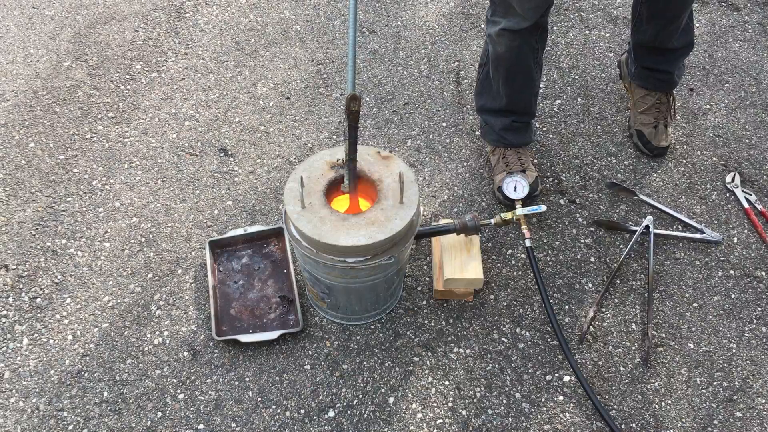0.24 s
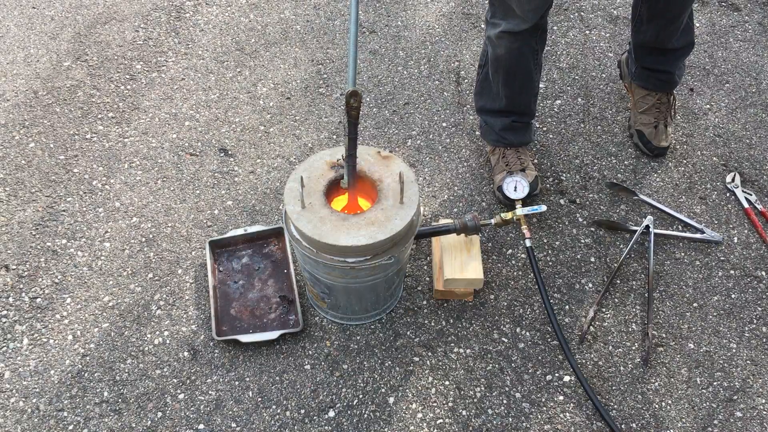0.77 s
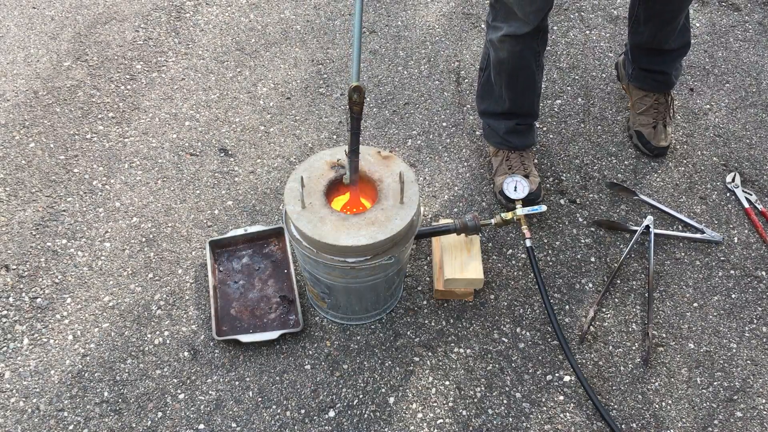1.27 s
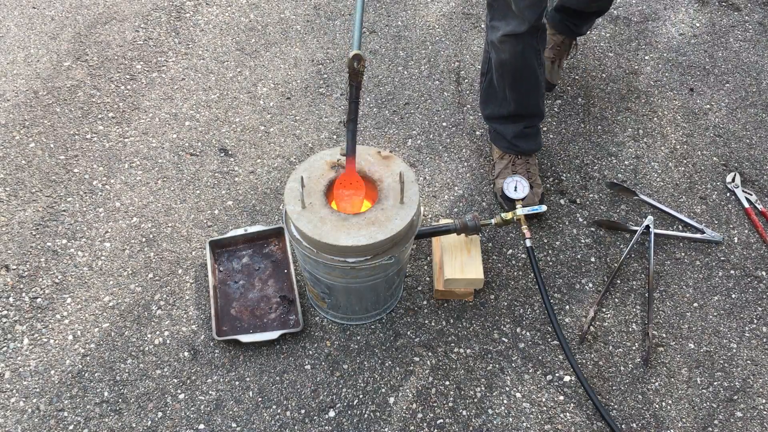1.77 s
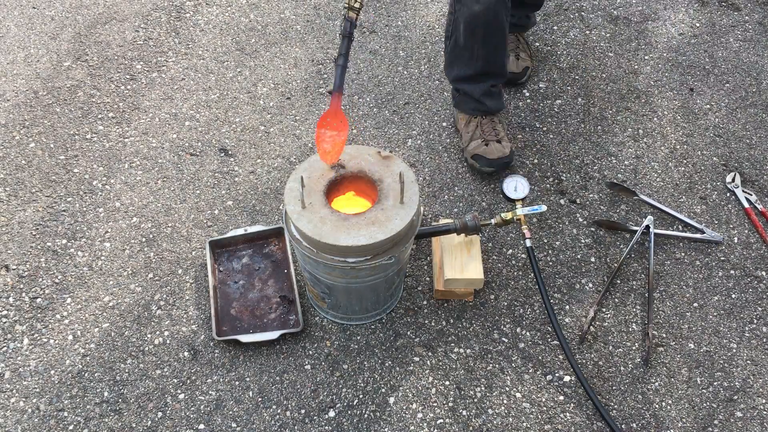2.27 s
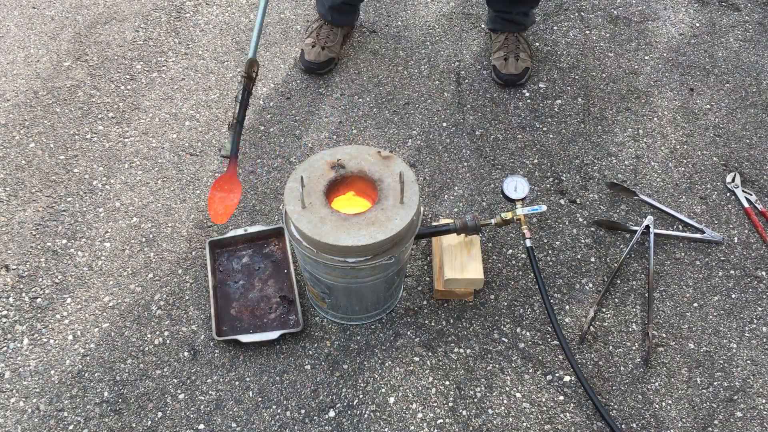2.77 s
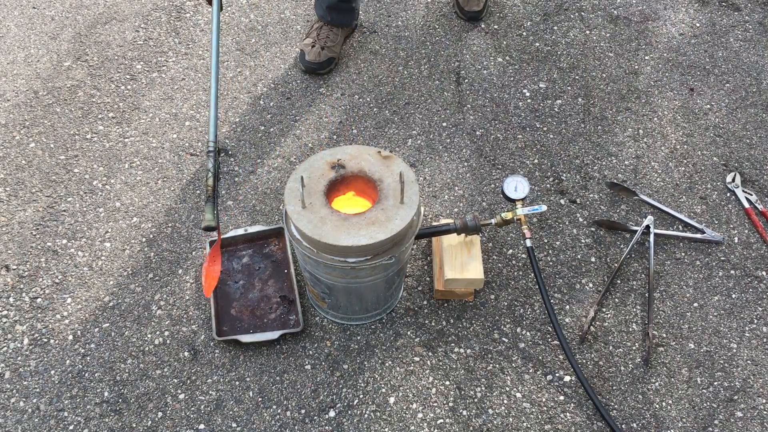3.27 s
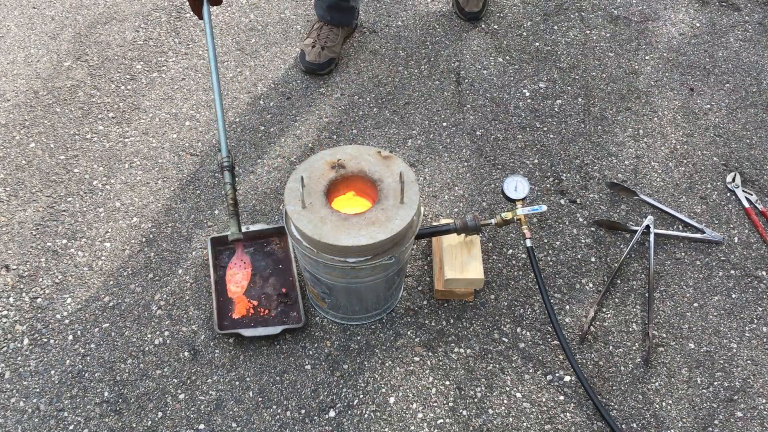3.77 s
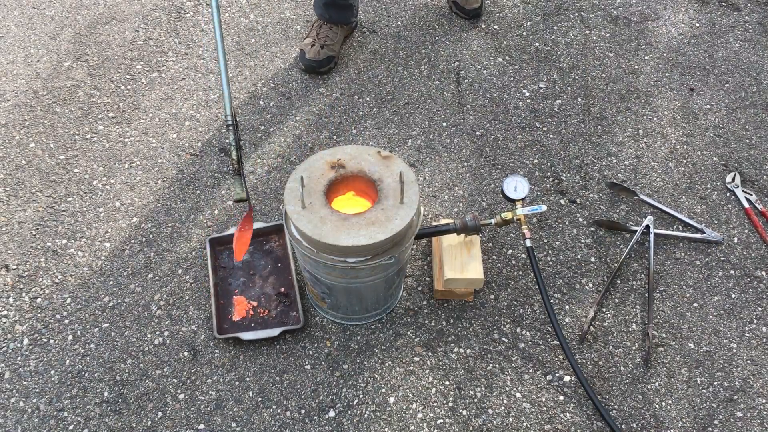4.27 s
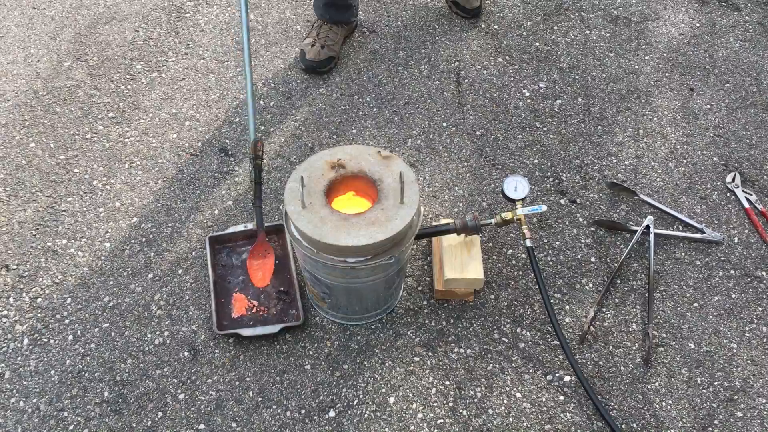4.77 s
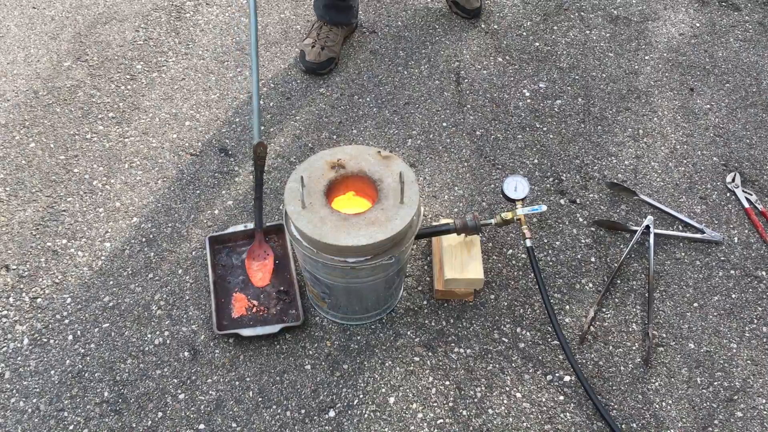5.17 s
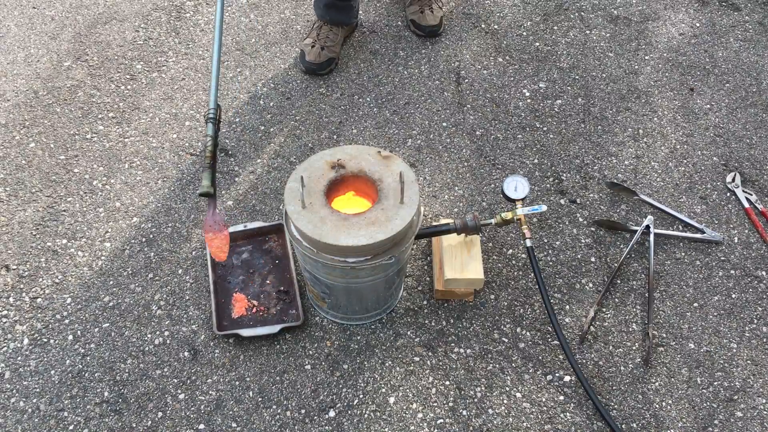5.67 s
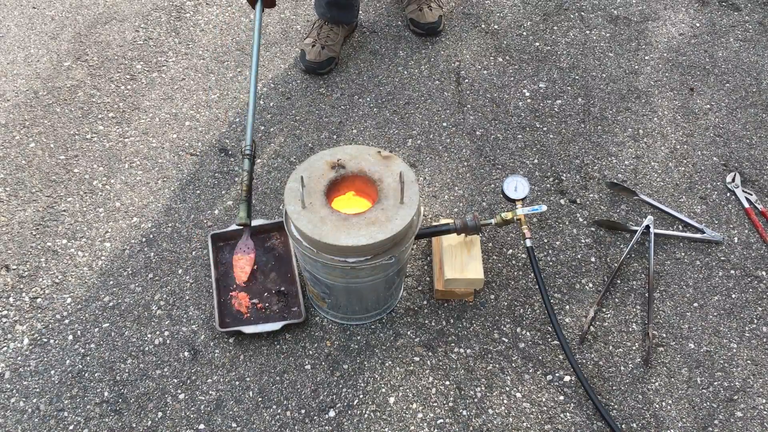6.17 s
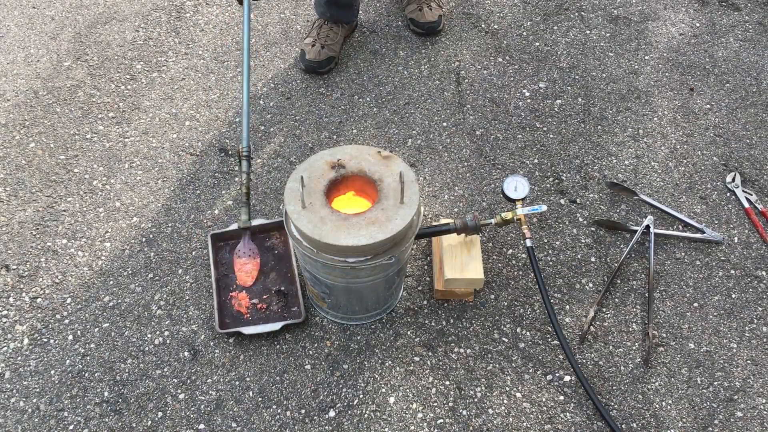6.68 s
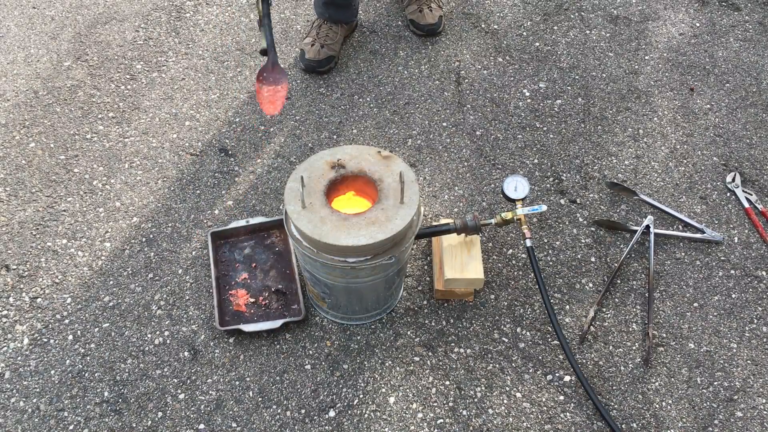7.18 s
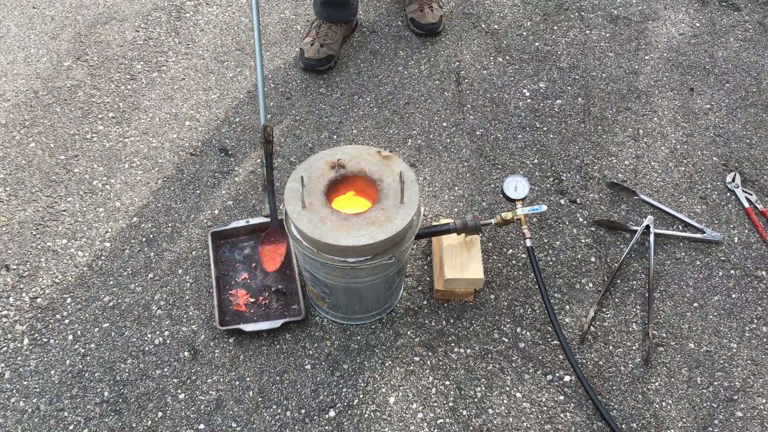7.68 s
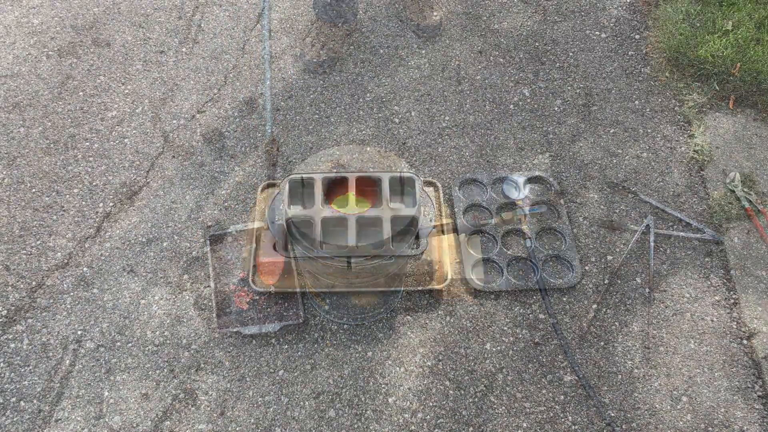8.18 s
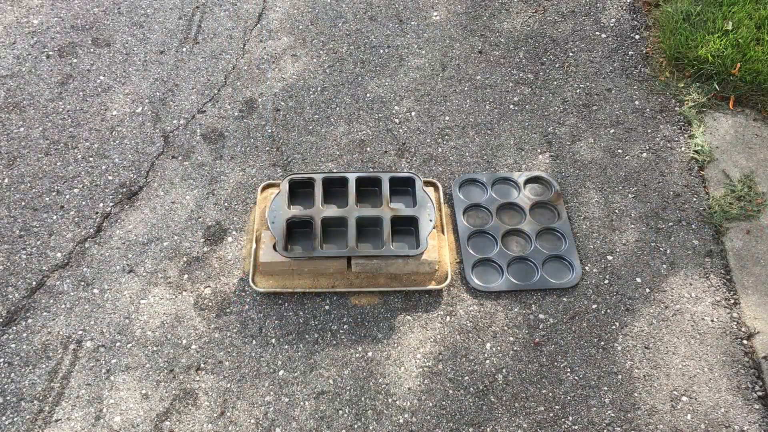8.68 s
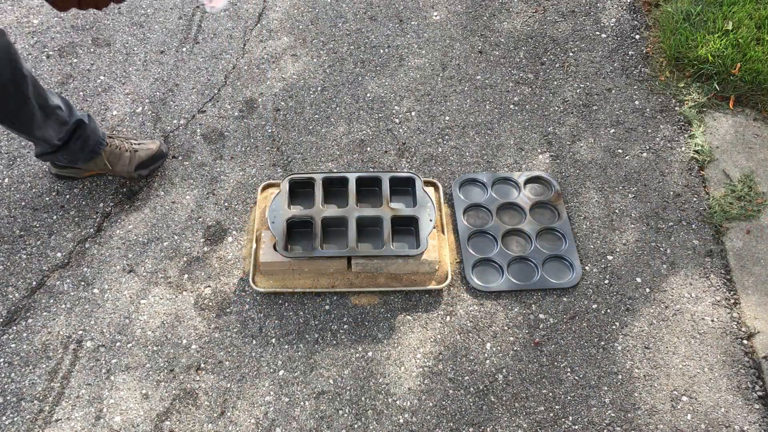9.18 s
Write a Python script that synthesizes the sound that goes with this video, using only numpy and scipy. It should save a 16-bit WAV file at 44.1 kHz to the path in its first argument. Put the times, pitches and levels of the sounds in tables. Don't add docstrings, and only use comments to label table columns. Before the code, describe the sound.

A small gas furnace roars outdoors from the start, a low, fluttering boom with a bright, steady gas hiss on top. Soft wind gusts thump the microphone around 0.4 to 0.9 s. Shoe soles scuff asphalt faintly from 1.4 to 2.4 s as the spoon leaves the mouth and the roar opens slightly. At 3.65 s the spoon bangs a sheet-metal pan: a loud, bouncing clang with short rim ringing and slag rattling until 3.9 s. Lighter taps come at 4.63 s, amid scuffs and small flares. Hard double clangs hit at 6.2 s, with a wind puff just before, and another at 6.82 s. A short scrape at 7.85 s ends in a knock at 8.0 s. The furnace fades and is gone by 8.35 s, leaving a very quiet yard: far traffic rumble, distant insects, a pulsing katydid, cricket chirps at 8.6 and 9.2 s, and grit crunching under a boot near 9.4 s.

```python
import sys
import numpy as np
from scipy import signal
from scipy.fft import rfft, irfft
from scipy.io import wavfile

SR = 44100
rng = np.random.default_rng(int(sys.argv[2]) if len(sys.argv) > 2 else 0)


def voltage_ratio(level):
    return 10 ** (np.asarray(level, float) / 20)


def generate_wav(sig):
    pcm = np.round(np.clip(np.atleast_2d(sig).T, -1, 1) * 32767).astype(np.int16)
    wavfile.write(sys.argv[1], SR, pcm)


N = 416304
TIME = np.arange(N) / SR
HZ = np.maximum(np.fft.rfftfreq(N, 1 / SR), 1)


def rms_one(x):
    return x / np.sqrt(np.mean(x ** 2) + 1e-20)


def in_time(rows):
    s, *columns = np.transpose(rows)
    return [np.interp(TIME, s, c) for c in columns]


def add_at(out, s, sound):
    start = round(s * SR)
    out[..., start:start + sound.shape[-1]] += sound


def bells(bumps):
    return sum(db / (1 + (2 * (HZ - hz) / width) ** 2) for hz, width, db in bumps)


def level_db(points, bumps):
    hz, db = np.transpose(points)
    return np.interp(np.log(HZ), np.log(hz), db) + bells(bumps)


def colour(x, points, bumps=()):
    return rms_one(irfft(rfft(x) * voltage_ratio(level_db(points, bumps)), N))


def resound(drive, points, bumps):
    body_db = level_db(points, bumps)
    cepstrum = irfft(body_db * np.log(10) / 20, N)
    cepstrum[1:N // 2] *= 2
    cepstrum[N // 2 + 1:] = 0
    body = np.exp(rfft(cepstrum)) / np.sqrt(np.mean(voltage_ratio(body_db) ** 2))
    return irfft(rfft(drive) * body, N)


def band(x, low_hz, high_hz):
    return signal.sosfilt(signal.butter(4, [low_hz, high_hz], "band", fs=SR, output="sos"), x)


def between(x, low_hz, high_hz):
    return signal.sosfiltfilt(signal.butter(2, [low_hz, high_hz], "band", fs=SR, output="sos"), x)


def drift(rate):
    r = np.exp(-80 * np.pi * rate / SR)
    slow = signal.lfilter([1], [1, -2 * r, r * r], rng.standard_normal(N // 40 + 2002))[2000:]
    return np.interp(np.arange(N) / 40, np.arange(len(slow)), rms_one(slow))


# frequency in Hz, level in dB per Hz.
FLAME_SPECTRUM = [(26, -53), (45, -19), (101, -5.5), (186, -4), (241, -1.5), (404, -2), (633, -10),
                  (779, -18.5), (959, -16.5), (1100, -19), (1350, -21), (1500, -34), (1880, -31.5),
                  (2800, -51), (3640, -70), (6160, -120)]
# frequency in Hz, width in Hz, level in dB.
CHAMBER_MODES = [(234, 46.5, -8), (423, 103, 3), (763, 37, -8), (918, 140, 2.5), (1120, 25, -12),
                 (1420, 46, 12.5), (1464, 79, -19.5), (1970, 80, 8), (2050, 134, -20)]
# time in seconds, share of the mouth filled (0-1).
SPOON_IN_MOUTH = [
    (0, 1),
    (1.75, 1),
    (2.1, 0),
    (9.44, 0),
]
# time in seconds, level of the mouth mode in dB.
MOUTH_SINGING = [
    (0.0, -33.5),
    (1.75, -34.5),
    (2.8, -29.5),
    (3.5, -29.5),
    (4.35, -31.5),
    (7.8, -30.5),
]
# time in seconds, share (0-1).
WORKER_LEAN = [
    (0, 0),
    (3.0, 0.07),
    (3.9, 0.5),
    (4.6, 1),
    (5.2, 0.8),
    (5.45, 0),
    (7.0, 0),
    (9.44, 0),
]
# time in seconds, swell in dB.
FLARES = [(0.130, 3.5), (0.239, 2.5), (0.385, -1), (0.671, 5.5), (1.0, 6), (2.568, 4), (2.670, 0),
          (2.95, 1), (3.091, -3), (3.496, 10), (4.352, 7), (4.928, 1.5), (5.053, 10.5), (5.375, 9),
          (7.457, 1)]
FLARE_RISE_S, FLARE_DECAY_S = 0.0024, 0.014
POCKETS_PER_S, POCKET_SHARE = 900, 0.6
ROAR_DB, UPPER_FLAME_DB = -21.5, -37.5


def flame():
    pockets = rms_one((rng.random(N) < POCKETS_PER_S / SR) * rng.exponential(1, N))
    turbulence = rng.standard_normal(N)
    heat = POCKET_SHARE * pockets + np.sqrt(1 - POCKET_SHARE ** 2) * turbulence
    roar = colour(heat * voltage_ratio(0.24 * drift(29)), FLAME_SPECTRUM, CHAMBER_MODES)
    (spoon,), (mouth_db,), (lean,) = in_time(SPOON_IN_MOUTH), in_time(MOUTH_SINGING), in_time(WORKER_LEAN)
    shifts = [(274, 345, mouth_db - np.mean(mouth_db)),
              (2130, 2500, 6.9 * spoon), (444, 580, 1.6 * spoon),
              (140, 243, 2.2 * spoon), (820, 1100, -1.3 * spoon),
              (1195, 1500, -5.1 * lean), (830, 1040, 1.0 * lean),
              (1000, 1120, -1.5 * lean), (130, 290, -1.1 * lean)]
    roar = roar + sum(between(roar, low_hz, high_hz) * (voltage_ratio(db) - 1) for low_hz, high_hz, db in shifts)

    flare_db, t = np.zeros(N), TIME[:SR // 4]
    flare = (1 - np.exp(-t / FLARE_RISE_S)) * np.exp(-t / FLARE_DECAY_S)
    for s, db in FLARES:
        add_at(flare_db, s, 1.14 * db * flare)
    low = between(roar, 25, 810)
    upper = voltage_ratio(UPPER_FLAME_DB - 1.3 + 0.2 * flare_db) * rms_one(roar - low)
    return voltage_ratio(ROAR_DB + flare_db) * rms_one(low) + upper


# frequency in Hz, level in dB per Hz.
JET_SPECTRUM = [(880, -35), (1500, -3), (1820, -1.5), (2660, -16.5), (2820, -12.5), (3180, -10),
                (4010, -11.5), (5000, -16.5), (6690, -11), (7470, -14), (8680, -9.5), (10500, -11.5),
                (15200, -12), (16000, -7.5), (16500, -38)]
# frequency in Hz, width in Hz, level in dB.
TUBE_WHISTLES = [(2620, 50, 13), (3180, 83, 3.5), (4040, 62, 8), (4800, 80, 7)]
# time in seconds, swing of the hiss in dB.
GAS_FLOW = [(0.0, -0.5), (0.59, -1.5), (1.17, 0), (2.0, 0.5), (2.19, 0.5), (2.35, 0.5), (3.15, -1.5),
            (3.52, 1.5), (4.02, 0.5), (4.3, 1.5), (4.47, 3), (4.63, 2.5), (5.32, 1), (5.49, 1.5),
            (6.15, 0.5), (6.67, 1), (7.06, 2), (7.8, 1)]
# start in seconds, end in seconds, level in dB.
LEG_SHADES = [
    (2.15, 3.25, -3.5),
    (3.954, 5.4, -2.5),
]
SHADE_EDGE_S = 0.14
TUBE_HZ, TUBE_ECHO = 662, 0.17
TUBE_DB, TUBE_FOLLOWS, TUBE_RISE_DB_PER_S, NOZZLE_DB = -57.5, 0.6, 0.24, -51.5


def jet():
    flow_db, = in_time(GAS_FLOW)
    shade_db = sum(db * np.clip(np.minimum(TIME - start, end - TIME) / SHADE_EDGE_S, 0, 1)
                   for start, end, db in LEG_SHADES)
    tube_db = TUBE_DB + TUBE_FOLLOWS * flow_db + TUBE_RISE_DB_PER_S * TIME + shade_db
    nozzle_db = NOZZLE_DB + flow_db
    echo = TUBE_ECHO / (1 + (HZ / 9000) ** 2) * np.exp(-2j * np.pi * HZ / TUBE_HZ)
    combed = irfft(rfft(rng.standard_normal(N)) / (1 - echo), N)
    hiss = colour(combed, JET_SPECTRUM, TUBE_WHISTLES)
    edges_hz = [2500, 3600, 5000, 6200, 7600, 9500, 11500, 13500, 15500]
    for low_hz, high_hz in zip(edges_hz[:-1], edges_hz[1:]):
        hiss = hiss + between(hiss, low_hz, high_hz) * (voltage_ratio(1.8 * drift(3.5)) - 1)
    tube = between(hiss, 900, 5700)
    nozzle = voltage_ratio(nozzle_db + 1.0 + 0.37 * drift(1.7)) * rms_one(hiss - tube)
    return voltage_ratio(tube_db + 4.5) * rms_one(tube) + nozzle


# time in seconds, rattle in dB, ring in dB.
BLOWS = [(3.647, -22, -18), (3.652, -12.5, -24), (3.659, -24, -17), (3.682, -22, -22), (3.697, -37, -24.5),
         (3.735, -42, -28), (3.775, -30.5, -36), (4.030, -43, -42.5), (4.629, -40, -33), (4.634, -33, -44),
         (4.645, -33, -35.5), (4.660, -35, -37), (4.674, -27.5, -38), (4.705, -35, -39), (4.735, -45, -47),
         (6.184, -18.5, -19), (6.195, -19.5, -17.5), (6.231, -21.5, -23.5), (6.814, -30, -23.5),
         (6.821, -21.5, -36), (6.850, -29, -31), (6.884, -36, -39), (6.915, -37, -46), (7.835, -43, -33.5),
         (8.006, -24.5, -32), (8.022, -23.5, -28)]
# time in seconds, rattle in dB, top above 10 kHz in dB.
SLAG_DROPS = [
    (3.748, -34, 3),
    (3.796, -26.5, 2),
    (3.824, -31, -3),
    (3.862, -33.5, -7),
    (3.900, -34, 6),
    (3.914, -38, 8),
    (6.307, -30.5, 3),
    (6.331, -33, 5),
]
# start in seconds, length in seconds, rattle in dB, ring in dB.
STROKES = [
    (7.842, 0.072, -28.5, -31.5),
    (7.924, .04, -29, -38),
]
# frequency in Hz, level in dB per Hz.
RATTLE_SPECTRUM = [(2000, -6), (3500, -7.5), (4800, -7.5), (5700, 0), (7000, -2.5), (9500, -2),
                   (10500, -4.5), (12500, -3), (16000, -4.5)]
# frequency in Hz, width in Hz, level in dB.
SPOON_MODES = [(5728, 50, 7), (5927, 30, 9), (6126, 50, 6), (6440, 50, 9), (6800, 60, 6), (7270, 50, 7),
               (7700, 50, 6), (8600, 60, 5), (9544, 35, 9), (11200, 70, 6), (12300, 70, 5), (13400, 80, 6)]
# frequency in Hz, level in dB per Hz.
SHEET_SPECTRUM = [(550, -38), (780, -2.5), (1100, -3), (1500, -2.5), (2000, -6.5), (2600, -4.5),
                  (3500, -11), (4800, -15.5), (7000, -35)]
# frequency in Hz, width in Hz, level in dB.
PAN_MODES = [(851, 35, 10), (1007, 28, 13), (1055, 30, 11), (1147, 30, 5), (1270, 35, 7), (1386, 30, 8),
             (1594, 18, 8), (1728, 24, 7), (1765, 46, 10), (1841, 22, 8), (1976, 18, 11), (2093, 26, 12),
             (2215, 28, 12), (2350, 30, 5), (2503, 18, 9), (2837, 26, 7), (2916, 18, 9), (3128, 26, 5),
             (3260, 38, 9), (3474, 22, 10), (3690, 28, 6), (4011, 30, 5), (4340, 35, 5)]
# frequency in Hz, width in Hz, level in dB.
EDGE_CLANG = [(1880, 260, 3), (1020, 260, -2), (3000, 1000, 0)]
TOP_DB, TOP_PER_DB, BLOW_T60_S, SHORTER_PER_DB = -3.5, 0.58, 0.25, 0.04
BLOW_RISE_S, SLAG_RISE_S, SLAG_T60_S, SLAG_RING_DB = 0.0012, 0.0004, 0.15, -21
STROKE_ATTACK_S, STROKE_RELEASE_S, STROKE_SAG_DB_PER_S = 0.017, 0.039, 30


def pan():
    shower = rng.standard_normal((2, N)) * voltage_ratio(1.5 * np.minimum(rng.exponential(1, (2, N)), 5))
    power, t = np.zeros((3, N)), TIME[:SR // 2]

    def strike(s, rattle_db, top_db, ring_db, t60, rise):
        burst = (1 - np.exp(-t / rise)) * voltage_ratio(-60 * t / t60)
        gains = voltage_ratio(np.array([[rattle_db], [rattle_db + top_db], [ring_db]]))
        add_at(power, s, (gains * burst) ** 2)

    for s, rattle_db, ring_db in BLOWS:
        excess_db = rattle_db - ring_db
        t60 = BLOW_T60_S * np.exp(-SHORTER_PER_DB * excess_db)
        strike(s, rattle_db, TOP_DB + TOP_PER_DB * excess_db, ring_db, t60, BLOW_RISE_S)
    for s, rattle_db, top_db in SLAG_DROPS:
        strike(s, rattle_db, top_db, rattle_db + SLAG_RING_DB, SLAG_T60_S, SLAG_RISE_S)
    for s, length, rattle_db, ring_db in STROKES:
        stroke = np.clip(t / STROKE_ATTACK_S, 0, 1) * np.exp(-np.maximum(t - length, 0) / STROKE_RELEASE_S)
        sag_db = -STROKE_SAG_DB_PER_S * t
        gains = voltage_ratio(np.array([rattle_db + sag_db, rattle_db + sag_db, ring_db + 0.3 * sag_db]))
        add_at(power, s, (stroke * gains) ** 2)

    rattle, top, ringing = np.sqrt(power)
    ringing = ringing * voltage_ratio(0.28 * drift(50))
    clatter = rms_one(shower[0]) * voltage_ratio(0.98 * drift(55))
    low = resound(rattle * clatter, RATTLE_SPECTRUM, SPOON_MODES)
    high = resound(top * clatter, RATTLE_SPECTRUM, SPOON_MODES)
    split = signal.butter(2, 10000, fs=SR, output="sos")
    bright = signal.sosfiltfilt(split, low) + high - signal.sosfiltfilt(split, high)
    return bright + resound(ringing * rms_one(shower[1]), SHEET_SPECTRUM, PAN_MODES + EDGE_CLANG)


# frequency in Hz, level in dB, t60 in seconds.
RIM_MODES = [(838, -2, 0.17), (1009, 0.5, 0.19), (1060, -6, 0.16), (1260, 0, 0.1), (1400, -4, 0.25),
             (1740, -5.5, 0.11), (1780, 1, 0.059), (1924, -6, 0.12), (2100, -1, 0.11), (2260, -7, 0.08),
             (2503, -9, 0.12), (2840, -10, 0.18), (2918, -6, .15), (3260, 1, .15)]
# time in seconds, level in dB, pitch in Hz.
RIM_HITS = [(3.648, -31, 2300), (3.657, -18, 1780), (3.654, -17, 850), (3.665, -17, 1780),
            (3.668, -24, 2230), (3.672, -24, 1000), (3.694, -16, 1740), (3.738, -21, 1000),
            (3.745, -36, 2840), (3.76, -32, 2100), (3.805, -38, 1800), (3.8, -35, 1000),
            (4.630, -27.5, 1260), (4.70, -31, 1260), (4.647, -29, 1850), (4.660, -28, 1100),
            (4.682, -33, 2000), (6.185, -18, 880), (6.204, -15, 2150), (6.229, -30, 1400),
            (6.29, -33, 2500), (6.186, -13, 2100), (6.189, -16, 1760), (6.198, -25, 1030),
            (6.215, -19, 1800), (6.255, -21, 1050), (6.25, -25, 1800), (6.815, -25, 1800),
            (6.822, -17.5, 2150), (6.826, -27, 2600), (6.834, -29, 1000), (6.846, -23, 2050),
            (7.86, -33, 2150), (7.885, -30, 1450), (8.026, -34, 1000)]
FAVOUR_DB_PER_OCTAVE = 42


def rim():
    out, t = np.zeros(N), TIME[:SR // 4]
    for s, db, near_hz in RIM_HITS:
        tone = 0
        for hz, mode_db, t60 in RIM_MODES:
            far_db = FAVOUR_DB_PER_OCTAVE * abs(np.log2(hz / near_hz))
            tone = tone + voltage_ratio(db + mode_db - far_db - 60 * t / t60) * np.sin(2 * np.pi * hz * t)
        add_at(out, s, tone * (1 - np.exp(-t / BLOW_RISE_S)))
    return out


# time in seconds, peak in dB, centre in Hz.
STEEL_CRACKS = [
    (3.6525, -7, 11000),
    (3.660, -8, 6000),
    (6.1848, -11, 2600),
    (6.1995, -8, 6800),
    (6.232, -11, 8000),
    (6.333, -20, 12000),
    (6.8225, -9, 13000),
    (6.8238, -9, 7200),
    (8.0078, -17, 7000),
    (8.0085, -22, 3000),
]
# time in seconds, peak in dB, centre in Hz.
GRIT = [(0.501, -33, 2700), (3.263, -32, 10000), (7.109, -29, 11000), (8.560, -51, 13000),
        (8.652, -53, 12000), (8.700, -50, 13000), (9.208, -50, 14000), (9.215, -52, 14000),
        (9.222, -51, 13000), (9.232, -53, 12000), (9.322, -51, 13000), (9.367, -33, 9000),
        (9.384, -50, 13000), (9.400, -48, 13000), (9.408, -46, 13000), (9.422, -34, 11000),
        (9.430, -37, 7000), (9.435, -40, 7000), (9.438, -32, 6500)]


def snaps(events, t60):
    size = 400
    out = np.zeros(N + size)
    noise = rng.standard_normal((len(events), size))
    decay = voltage_ratio(-60 * np.arange(size) / SR / t60)
    for (s, db, hz), puff in zip(events, noise):
        edges_hz = [hz / 1.6, min(hz * 1.6, 0.45 * SR)]
        sos = signal.butter(2, edges_hz, "band", fs=SR, output="sos")
        snap = signal.sosfilt(sos, puff * decay)
        add_at(out, s, voltage_ratio(db) * snap / np.abs(snap).max())
    return out[:N]


# start in seconds, length in seconds, level in dB, low edge in Hz.
SCUFFS = [
    (1.38, .04, -60, 8000),
    (1.6, 0.11, -54, 6500),
    (1.95, 0.12, -50, 8000),
    (2.08, .3, -60, 8000),
    (3.38, .14, -56, 5000),
    (3.89, .05, -55, 9000),
    (4.25, .1, -58, 8000),
    (4.45, .12, -52, 5000),
]


def scuffs():
    out, noise = np.zeros(N), rng.standard_normal(N) * voltage_ratio(2.5 * drift(40))
    for s, length, db, low_hz in SCUFFS:
        brush = np.clip((TIME - s) / 0.012, 0, 1) * np.clip(1.5 - (TIME - s) / length, 0, 1)
        out += voltage_ratio(db) * brush * rms_one(band(noise, low_hz, 15500))
    return out


# peak in seconds, level in dB, half length in seconds.
GUSTS = [
    (0.42, -31, .15),
    (0.677, -29, 0.063),
    (0.92, -35, .15),
    (3.1, -51, .3),
    (3.7, -51, .2),
    (4.46, -40, .12),
    (6.1, -30, .08),
    (6.36, -46, .07),
    (8.3, -48, .1),
    (8.653, -39, 0.18),
]
BREEZE_DB, GUST_SLOPE_DB = -69, 11


def wind():
    gusts = sum(voltage_ratio(db - GUST_SLOPE_DB * np.abs(TIME - s) / half) ** 2 for s, db, half in GUSTS)
    power = voltage_ratio(BREEZE_DB) ** 2 + gusts
    return voltage_ratio(-3.5) * np.sqrt(power) * rms_one(band(rng.standard_normal(N), 28, 75))


CHIRPS_S = [8.595, 9.196]
CHIRP_STROKES_DB = [-62, -57, -56]
CHIRP_GAP_S = 0.038


def cricket():
    out, t = np.zeros(N), np.arange(round(0.028 * SR)) / SR
    stroke = np.hanning(len(t)) * np.sin(2 * np.pi * (4900 * t - 9000 * t ** 2))
    for s in CHIRPS_S:
        for k, db in enumerate(CHIRP_STROKES_DB):
            add_at(out, s + k * CHIRP_GAP_S, voltage_ratio(db) * stroke)
    return out


KATYDID_HZ, KATYDID_PER_S, KATYDID_DB = 8900, 15.8, -58


def katydid():
    strokes = np.maximum(np.cos(2 * np.pi * KATYDID_PER_S * (TIME - 8.43)), 0) ** 5
    phrase = np.interp(TIME, [8.3, 8.4, 8.86, 8.95, 9.15, 9.25], [0, 1, 1, 0.2, 0.2, 0.8])
    loudness = voltage_ratio(KATYDID_DB) * strokes * phrase * voltage_ratio(2.7 * drift(9))
    return loudness * np.sin(2 * np.pi * np.cumsum(KATYDID_HZ + 90 * drift(60)) / SR)


# frequency in Hz, width in Hz, level in dB.
CHORUS = [(5510, 750, -66), (6620, 980, -63), (8420, 430, -67), (9040, 270, -69.5)]


def insects():
    return sum(voltage_ratio(db + 2.3 * drift(30)) * rms_one(band(rng.standard_normal(N), hz - width / 2, hz + width / 2))
               for hz, width, db in CHORUS)


# frequency in Hz, level in dB per Hz.
YARD_SPECTRUM = [(12, -41), (20, -27.5), (53, -1), (77, -6), (179, -17.5), (305, -31), (994, -27),
                 (2810, -40), (3830, -47), (6910, -29.5), (7730, -32), (8650, -34), (10500, -49),
                 (15200, -55), (16500, -70)]
YARD_DB = -45


def yard():
    bumps = [(6800, 5000, -9), (30, 30, -15), (258, 110, -1.5)]   # Hz, width Hz, dB
    return voltage_ratio(YARD_DB + 1.2 * drift(11.0)) * colour(rng.standard_normal(N), YARD_SPECTRUM, bumps)


FADE_FROM_S, FADE_CUT_S, FADE_END_SHARE = 7.974, 8.342, 0.12


def scene():
    near = np.interp(TIME, [FADE_FROM_S, FADE_CUT_S, FADE_CUT_S + 100 / SR], [1, FADE_END_SHARE, 0])
    places = near * (flame() + jet()) + (1 - near) * yard()
    knocks = pan() + rim() + snaps(STEEL_CRACKS, 0.0017)
    steps = snaps(GRIT, 0.0042) + scuffs()
    singers = insects() * voltage_ratio(1.5 * near) + katydid() + cricket()
    return (places + knocks + steps + wind() + singers)[None]


def low_pass(x):
    return signal.sosfilt(signal.butter(12, 17010, fs=SR, output="sos"), x)


# frequency in Hz, width in Hz, level in dB.
MICROPHONE_RIPPLES = [(10420, 330, -4), (12700, 400, 0.5), (15700, 630, 1)]
CUTOFF_HZ, LEAK = 15760, 0.003


def record(dry):
    rumble_filter = 1 / (1 + (30 / HZ) ** 4)
    steep_cut = np.clip((CUTOFF_HZ - HZ) / 40, LEAK, 1)
    gain = voltage_ratio(bells(MICROPHONE_RIPPLES)) * rumble_filter * steep_cut
    rounded = 0.95 * np.tanh(dry / 0.95)
    mix = irfft(rfft(rounded) * gain, N)
    return low_pass(mix)


dry = scene()
out = record(dry)
generate_wav(out)
```